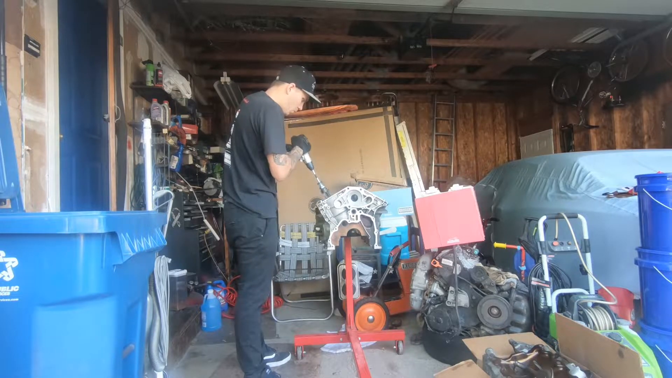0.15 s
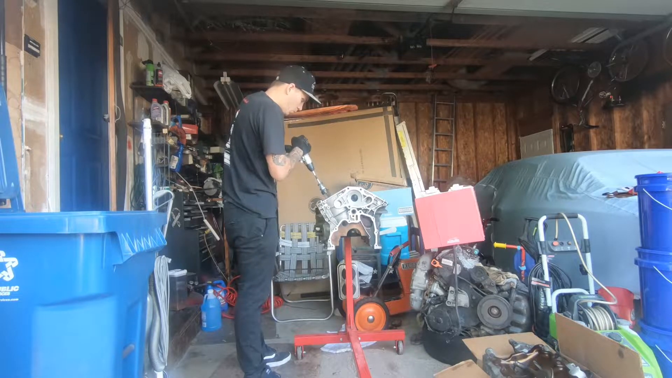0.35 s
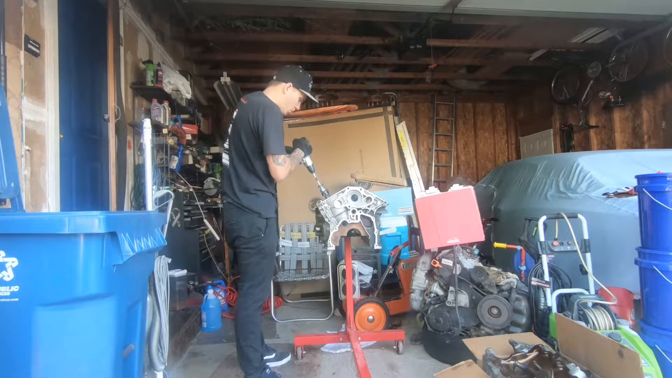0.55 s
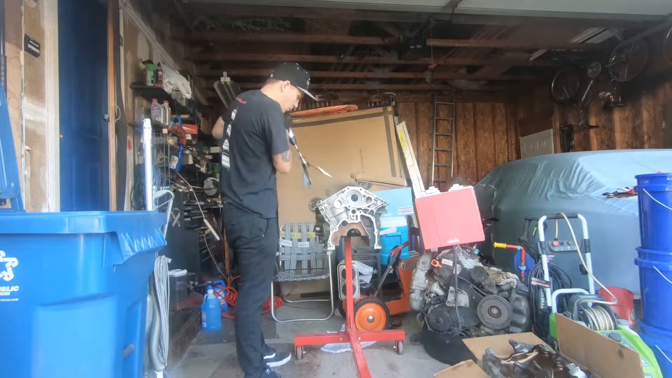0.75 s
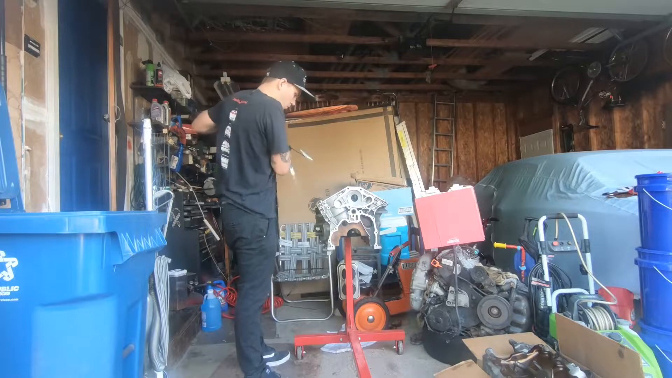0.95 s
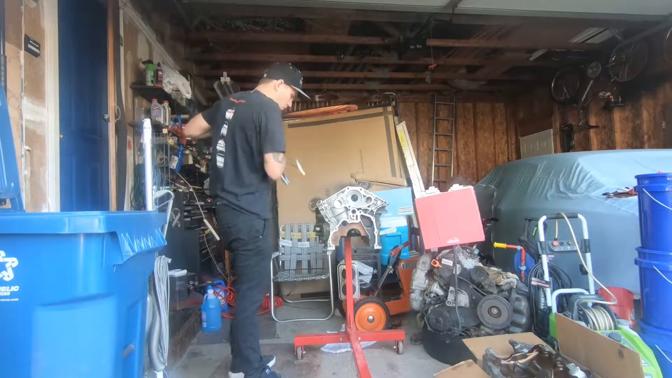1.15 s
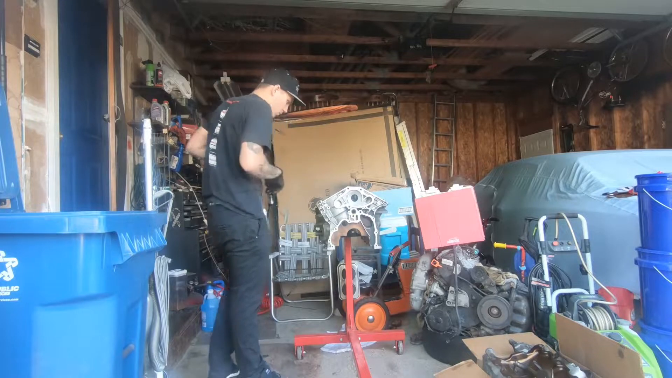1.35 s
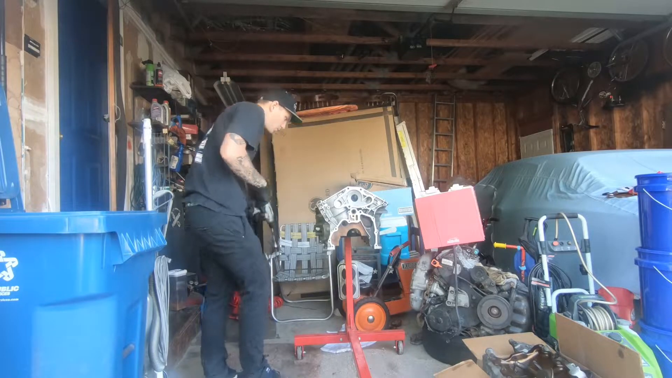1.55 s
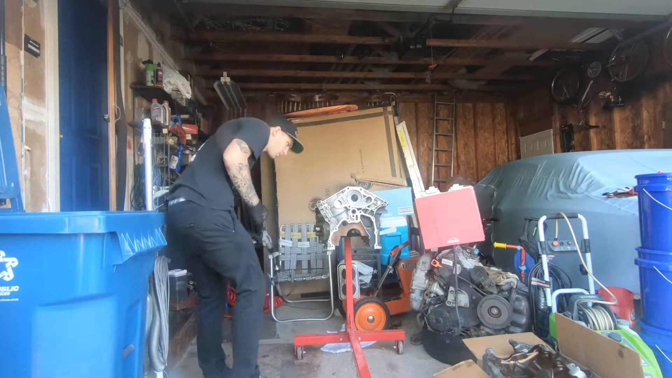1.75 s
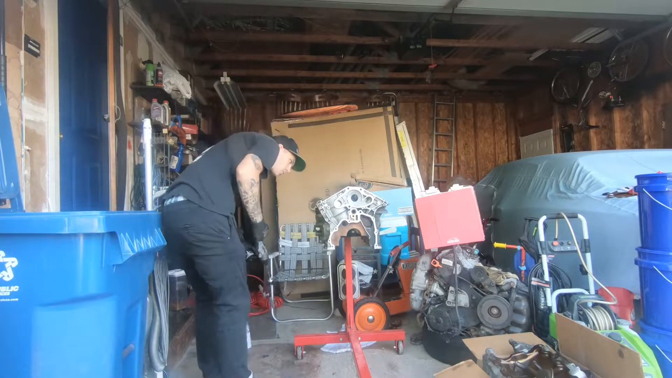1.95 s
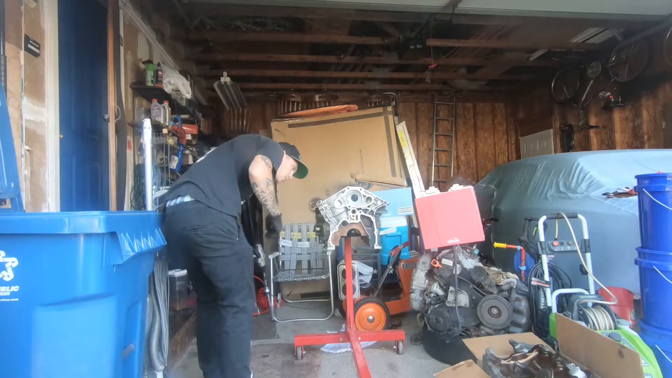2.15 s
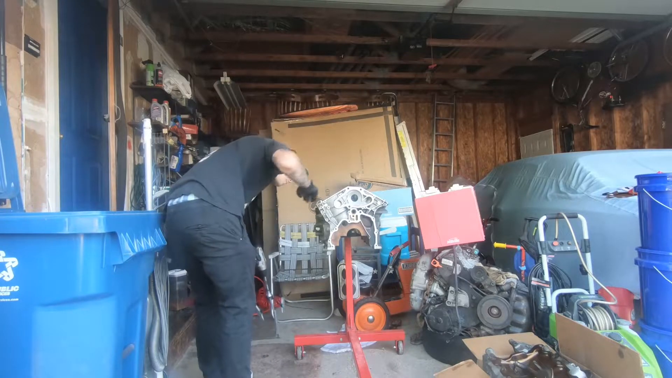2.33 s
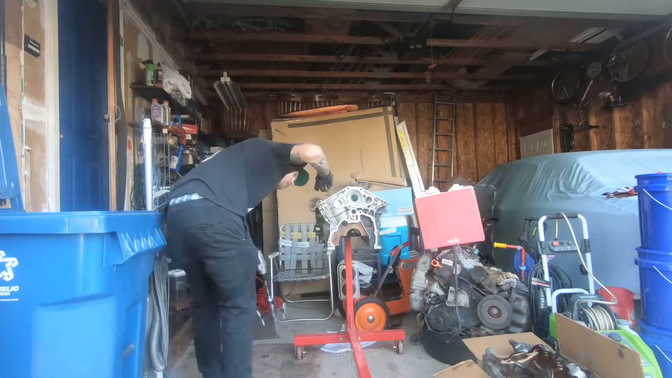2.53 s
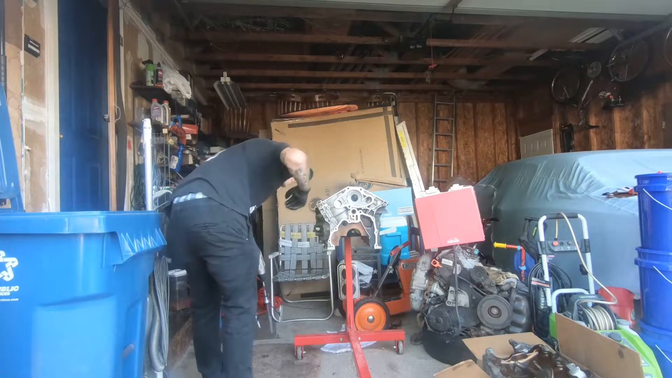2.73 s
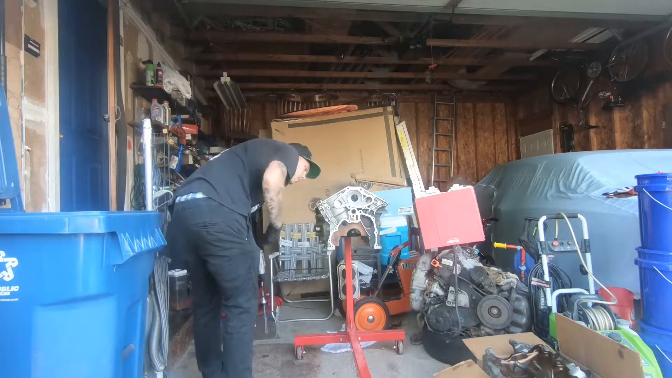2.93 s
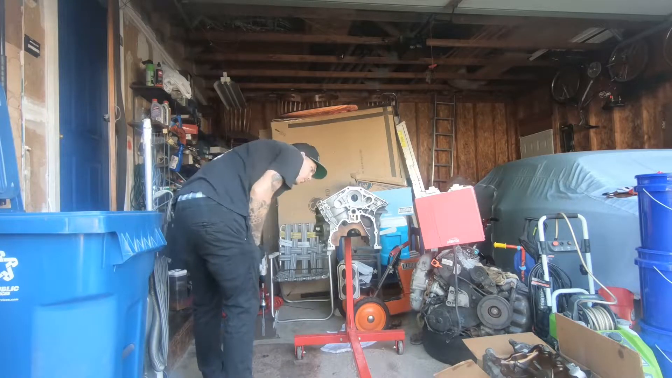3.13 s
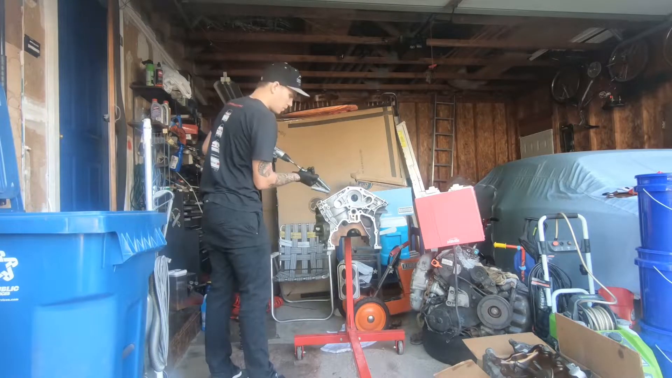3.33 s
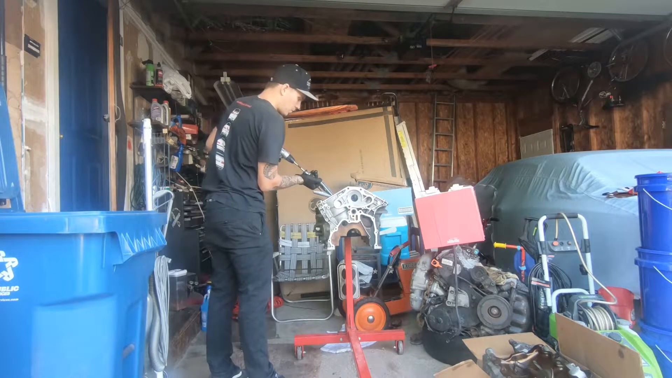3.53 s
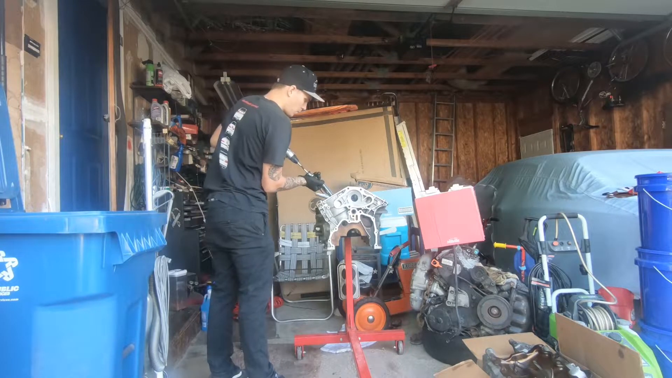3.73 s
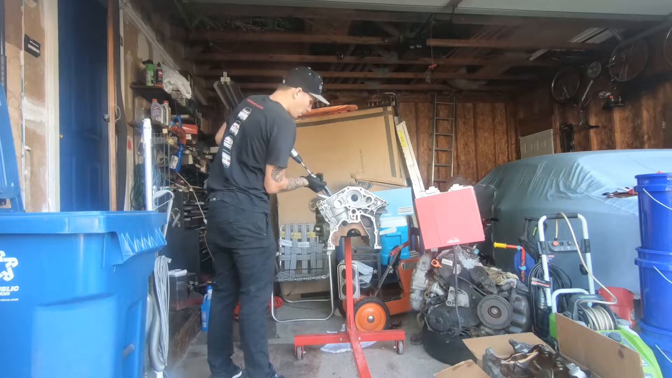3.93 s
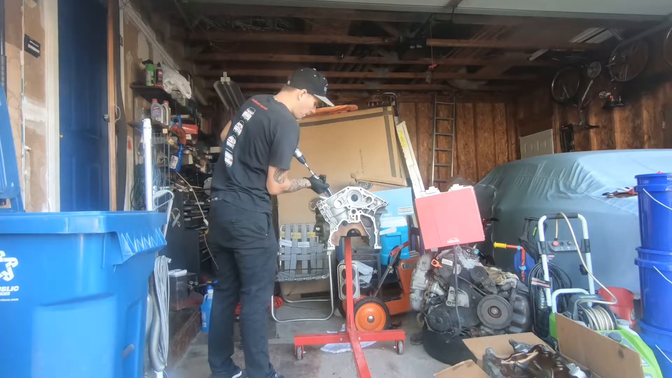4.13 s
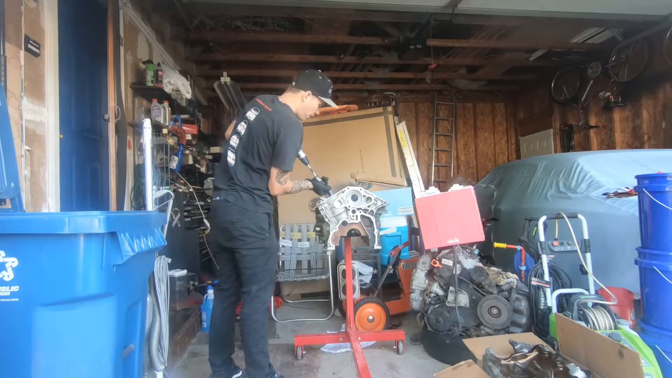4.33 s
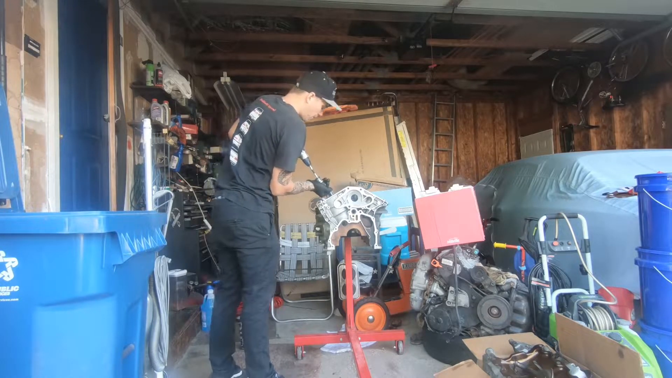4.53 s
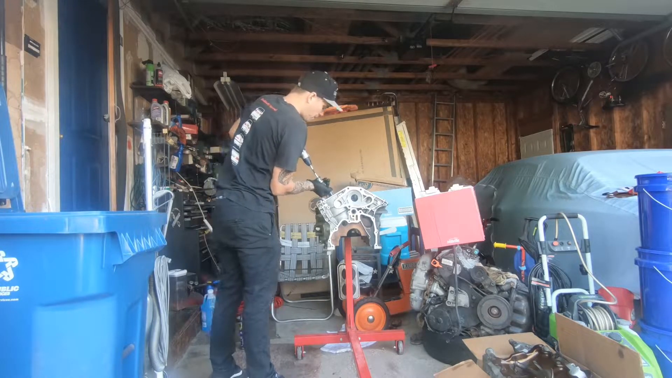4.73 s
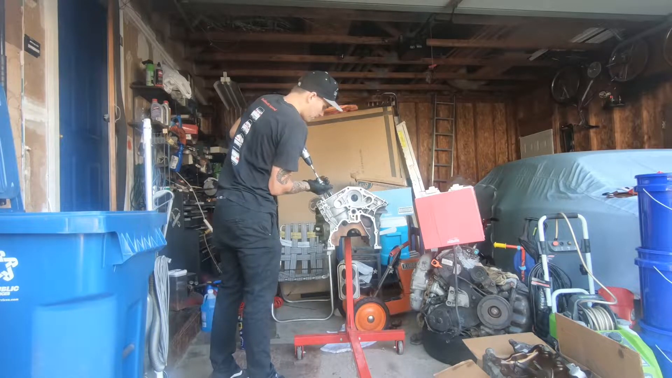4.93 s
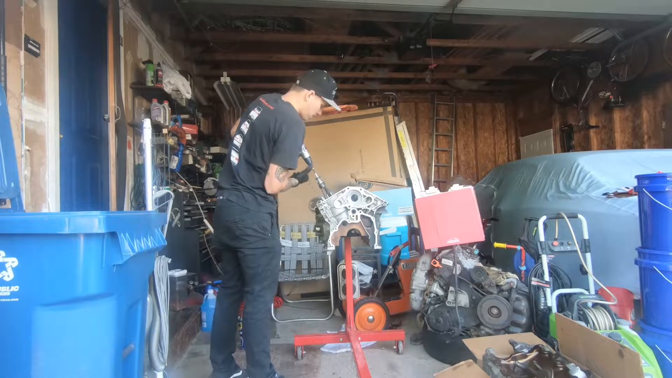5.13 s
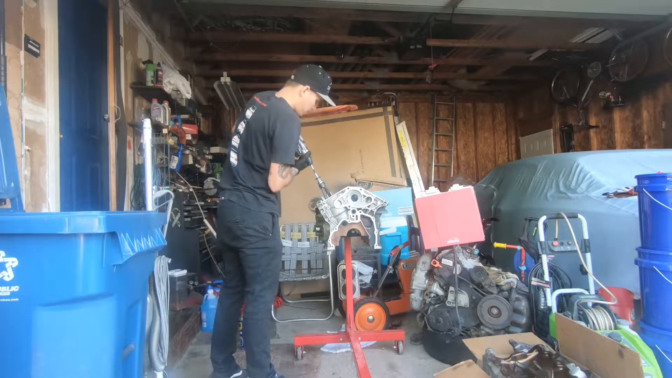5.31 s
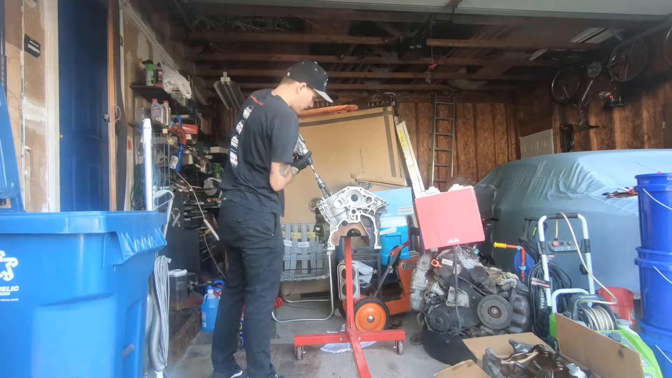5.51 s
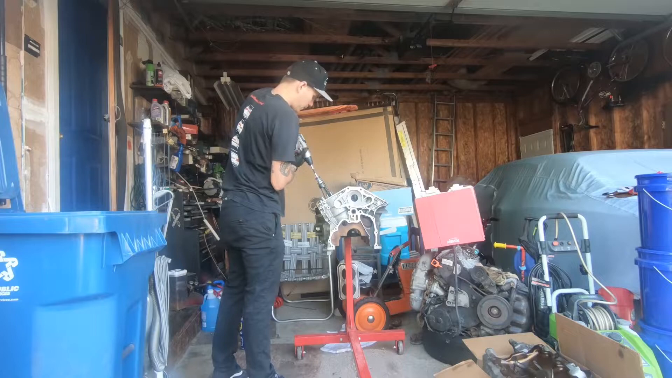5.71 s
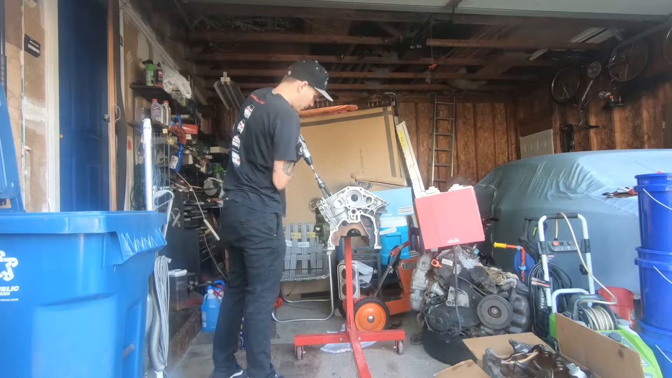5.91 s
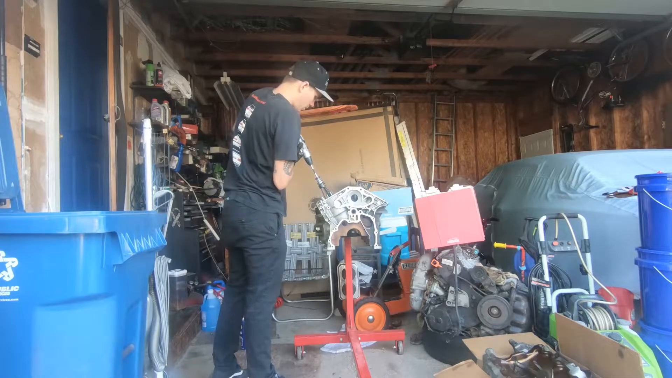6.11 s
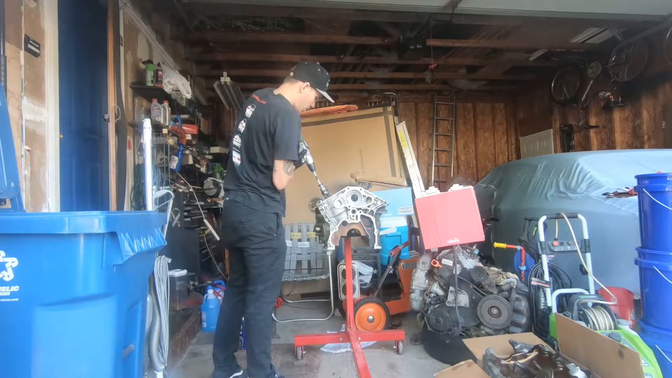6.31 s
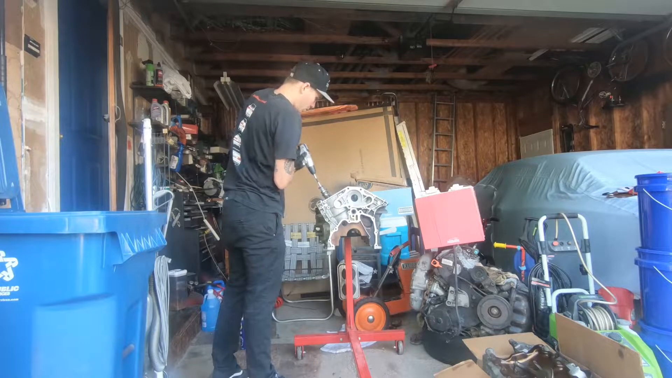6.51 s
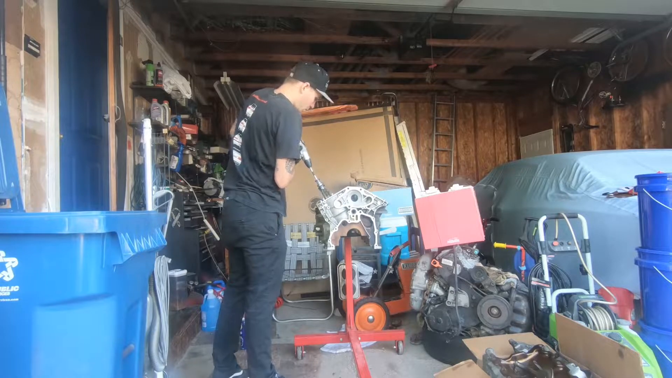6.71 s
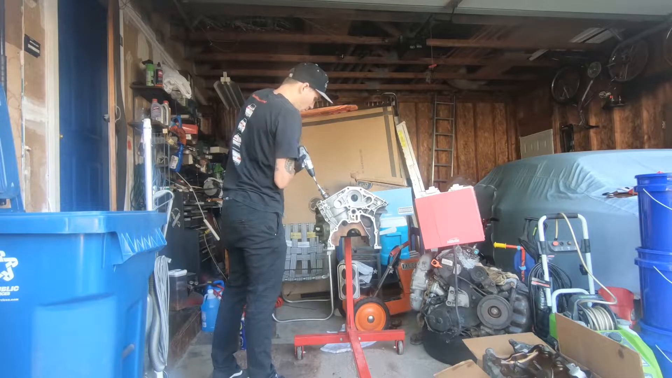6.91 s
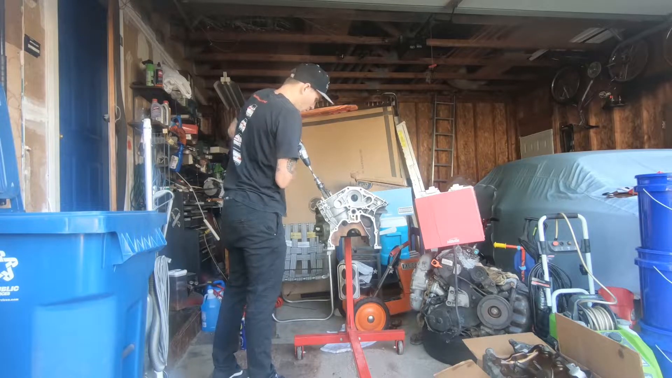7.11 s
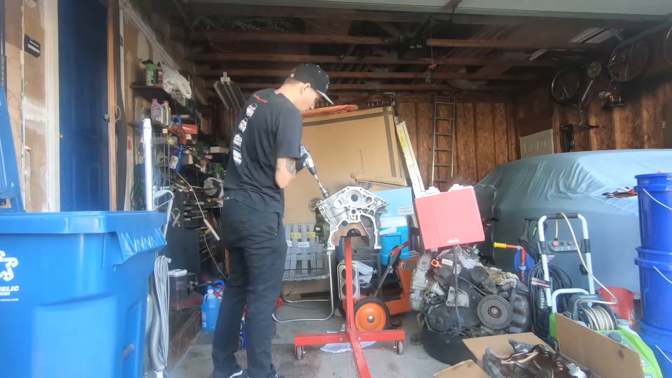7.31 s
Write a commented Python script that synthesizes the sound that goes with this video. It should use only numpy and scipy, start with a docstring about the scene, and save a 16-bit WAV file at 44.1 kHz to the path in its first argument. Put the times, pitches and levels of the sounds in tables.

```python
"""A honing tool scrapes the bore of an engine block in an open garage: dense grit noise rings the iron's modes.
Gusts buffet two microphone ports as bass noise over a faint yard, a throbbing insect and a swelling low drone.
The stones knock on the iron as they pass the rim, rattles striking the modes; a short squeak slides down,
the tool is pulled out, a cricket chirps, a shoe scuffs concrete and a steady hiss sets in. The tool is put
back with more knocks, a small part pings as one decaying sine, and the honing starts again."""
import sys
import numpy as np
from scipy import signal
from scipy.fft import rfft, irfft
from scipy.io import wavfile
from scipy.ndimage import uniform_filter1d

SR = 44100
rng = np.random.default_rng(int(sys.argv[2]) if len(sys.argv) > 2 else 0)


def dump(signal):
    """Clip the signal to [-1, 1] and save it as 16-bit WAV at the path in sys.argv[1]."""
    limited = np.clip(np.atleast_2d(signal).T, -1, 1)
    pcm = np.round(limited * 32767).astype(np.int16)
    wavfile.write(sys.argv[1], SR, pcm)


N = 324576
T = np.arange(N) / SR
SLOW_T = T[::16]   # coarse clock for slow controls
HZ = np.maximum(np.arange(N // 2 + 1) * SR / N, 1)

# modes of the engine block: [f/Hz, relative level under the stones/dB, level under a knock/dB, base t60/s]
BLOCK_MODES = [(302, -21, -40, .25), (690, -26, -40, .25), (912, -20, -35, .3), (1410, -32, -16, .42),
               (1613, -15, -10, .24), (2158, -13, -16, .3), (2272, -19, -11, .25), (2450, -10.5, -14, .3),
               (2552, -17, -11, .3), (2862, -13, -13, .3), (3095, -14, -13, .3), (3313, -11, -4, .3),
               (3399, -7, -6, .25), (3461, -9, -4, .22), (3619, -12, -6, .36), (3790, -13, -2, .36),
               (4046, -12, -14, .25), (4753, -22, -10, .2), (5280, -12, -15, .2), (5671, -10, -9, .2),
               (5925, -8, -14, .25), (6360, -15, -15, .15), (6998, -17, -15, .25)]
# left-right likeness of sounds in the garage: [f/Hz, correlation 0 to 1]
NEAR_LIKENESS = [(60, 0.12), (110, 0.15), (200, 0.12), (380, 0.3), (700, 0.3), (1290, 0.02), (2380, 0.74),
                 (4400, 0.9), (8120, 0.15), (15000, 1)]
# left-right likeness of sounds from outside: [f/Hz, correlation -1 to 1]
FAR_LIKENESS = [(60, -0.23), (150, -0.12), (380, -0.33), (950, -0.76), (2380, 0.42), (5980, 0.17),
                (15000, -0.36)]
# stereo lean of the work on the block: [f/Hz, left over right/dB]
WORK_LEAN = [(60, 14.5), (150, -4), (380, -18), (950, -5.5), (2380, -0.5), (5980, -3), (15000, 2)]


def from_db(db):
    """Decibels to gain."""
    return 10 ** (np.asarray(db) / 20)


def rms_one(x):
    """Scale to unit rms."""
    return x / np.sqrt(np.mean(x ** 2) + 1e-20)


def in_time(rows):
    """Columns of a curve at every sample; the level (first column) is silent outside the rows."""
    s, level, *rest = np.transpose(rows)
    return [np.interp(T, s, level, -140, -140)] + [np.interp(T, s, c) for c in rest]


def at_hz(points):
    """A spectrum table read at every frequency bin, straight lines over log frequency."""
    hz, value = np.transpose(points)
    return np.interp(np.log(HZ), np.log(hz), value)


def swell_db(start, hold, rise, fall, t=T):
    """Rise, hold at 0 dB, fall; slopes in dB per second."""
    return -rise * np.maximum(start - t, 0) - fall * np.maximum(t - start - hold, 0)


def drift(rate):
    """Slow random wander of spread 1, low-passed around the rate in Hz."""
    hz = np.fft.rfftfreq(len(SLOW_T), SLOW_T[1])
    spectrum = rfft(rng.standard_normal(len(SLOW_T))) / (1 + (hz / rate) ** 2)
    return np.interp(T, SLOW_T, rms_one(irfft(spectrum, len(SLOW_T))))


def grains(per_s, spread_db):
    """Two unrelated trains of random clicks of uneven size."""
    sizes = from_db(spread_db * np.minimum(rng.exponential(1, (2, N)), 5)) * rng.standard_normal((2, N))
    return rms_one(sizes * (rng.random((2, N)) < per_s / SR))


def stereo(pair, spectrum, likeness, lean_db=0):
    """Two unrelated signals become a coloured left and right that are partly alike; rms 1."""
    mid, side = rfft(pair) * from_db(at_hz(spectrum))
    alike = np.clip(at_hz(likeness), -1, 1)
    both = np.sqrt(1 + alike) * mid + np.sqrt(1 - alike) * side * [[1], [-1]]
    return rms_one(irfft(both * from_db(lean_db * np.array([[.5], [-.5]])), N))


def band(x, low_hz, high_hz, order=2):
    """Band-pass."""
    return signal.sosfilt(signal.butter(order, [low_hz, high_hz], "band", fs=SR, output="sos"), x)


def ring(force, hz, t60):
    """A two-pole resonance: a unit click sets a dying sine of starting height 1 ringing."""
    r, w = from_db(-60 / (t60 * SR)), 2 * np.pi * hz / SR
    return signal.lfilter([0, np.sin(w)], [1, -2 * r * np.cos(w), r * r], force + 1e-18)


def honing():
    """Dense grit contacts: a broad scrape, and the same force ringing the block."""
    # passes of the stones in the bore, one curve each: [t/s, level/dB, treble gain/dB]
    passes = [
        [(0.0, -38.5, 4), (0.09, -43, 3.5), (0.18, -37.5, 3.5), (0.45, -43, 3), (0.47, -38.5, 9),
         (0.56, -48.5, 3.5), (0.67, -41, 9.5), (.72, -41, 12)],
        [(6.12, -72, -15), (6.214, -45, -5), (6.285, -39.5, 2), (6.38, -39, 1.5), (6.5, -38, 2.5),
         (6.7, -38, 3), (6.8, -40.5, 2.5), (7.04, -36.5, 4), (7.18, -37.5, 2), (7.36, -40.5, 3)],
    ]
    # colour of the grit: [f/Hz, relative level per Hz/dB]
    grit_colour = [(150, -43), (250, -23.5), (482, -25.5), (930, -14.5), (1110, -16), (1560, -7.5),
                   (2280, -10), (2410, -5), (3170, -5), (3400, 3), (4640, -12), (5810, -1.5), (8210, -15),
                   (13300, -27), (15600, -26)]
    force = grains(per_s=9000, spread_db=1.0) * from_db(1.5 * drift(12.0))
    scrape = stereo(force, grit_colour, NEAR_LIKENESS, at_hz(WORK_LEAN))
    treble = band(scrape, 4600, 15000)
    # mostly the same force in both ears, with a little difference for width
    block_force = force[0] + 0.28 * force[1] * np.array([[1], [-1]])
    rings = np.zeros((2, N))
    for hz, stones_db, _, t60 in BLOCK_MODES:
        mode = rms_one(ring(block_force, hz, 1.9 * t60))   # rings longer than the base t60
        rings += from_db(stones_db + 1.794 * drift(3.1)) * mode
    rings = from_db(-4.0) * rms_one(rings)
    out = np.zeros((2, N))
    for rows in passes:
        level_db, treble_db = in_time(rows)
        out += from_db(level_db) * (scrape + (from_db(treble_db) - 1) * treble + rings)
    return out


def wind():
    """Lumpy turbulence in three bass bands, unrelated in the two ports; gusts and their wakes add as power."""
    # gusts: [start/s, hold/s, left/dB, right/dB, deep bass against the level/dB, upper bass against the level/dB]
    gusts = [(0.022, 0.061, -18, -29, -25, -5), (0.139, 0.052, -16.5, -33, -19, -6.5),
             (0.216, 0.094, -20.5, -29.5, -9, -7.5), (0.419, 0.12, -26.5, -34.5, -6.5, -19.5),
             (.56, 0.15, -38, -37.5, -14, -21), (0.729, 0.049, -34.5, -41, -13, -21.5),
             (.83, 0.015, -35.5, -46, -6, -18.5), (.9, 0.026, -40, -47, -2, -9.5),
             (1.25, 0.019, -53.5, -48.5, -3.5, -7.5), (1.33, 0.017, -38, -49.5, -7, -15.5),
             (1.71, .02, -42, -54, -0.5, -28), (1.85, 0.037, -62.5, -61, 8, 14),
             (1.959, 0.011, -31, -42.5, -12.5, -11), (2.08, .05, -50, -46, -4, -6.5),
             (2.25, 0.204, -67.5, -69.5, 9.5, 8), (2.79, 0.097, -47, -51, 5, -2),
             (2.94, 0.018, -43, -47, -6, 1.5), (3.0, 0.019, -20, -38, -17, -12),
             (3.039, 0.039, -31, -38, 0, -10), (3.189, 0.013, -31.5, -39, -10, -22),
             (4.22, 0.15, -63, -65.5, -1, 7), (4.55, 0.1, -66, -65, 11.5, 0),
             (4.81, 0.014, -31.5, -42.5, -10, -13.5), (5.0, 0.034, -50.5, -46, -2.5, -8),
             (5.11, 0.01, -39, -44, -11, -4), (5.75, .03, -26, -32.5, -12.5, -9),
             (5.811, 0.016, -24, -30, -12, -19), (5.861, 0.013, -30.5, -41, -6.5, -0.5),
             (6.041, 0.017, -35, -34, 0, -2.5), (6.21, .12, -62, -65, 14, -2),
             (6.42, .12, -72, -68, 15, -1), (7.072, .06, -30.5, -31.5, -14, -14),
             (7.16, 0.063, -35.5, -39.5, -4.5, -4.5), (7.342, .03, -46, -38, -8, 2.5)]
    # floor between gusts: [middle/dB, deep/dB, upper bass/dB]
    calm_db = (-76, -60.5, -63.5)
    gust_rise, gust_fall = 600, 550   # dB per s
    wake_db, wake_slope = -24.5, 180   # weaker stir before and after: dB under the gust, dB per s
    deep_slowness = 2.6   # the deep bass swells and fades this many times more slowly
    # doubled decibels give power; axes: band, port, time
    power = from_db(2 * np.array(calm_db))[:, None, None] * np.ones((3, 2, len(SLOW_T)))
    for start, hold, left_db, right_db, deep_db, upper_db in gusts:
        edge_db = swell_db(start, hold, gust_rise, gust_fall, SLOW_T)
        shapes = from_db(2 * np.array([edge_db, edge_db / deep_slowness + deep_db, edge_db + upper_db]))
        wake = from_db(2 * (wake_db + swell_db(start, hold, wake_slope, wake_slope, SLOW_T)))
        wakes = wake * from_db(2 * np.array([[0], [deep_db], [upper_db]]))
        ports = from_db(2 * np.array([[left_db], [right_db]]))
        power += (shapes + wakes)[:, None] * ports
    level = np.array([[np.interp(T, SLOW_T, np.sqrt(p)) for p in pair] for pair in power])
    white = rng.standard_normal((3, 2, N))
    deep = band(white[0], 20, 40, order=3)
    middle = band(white[1], 52, 96.6)
    upper = rms_one(band(white[2], 105, 176))
    lumps = from_db(1.18 * np.array([drift(6), drift(32)]))   # slow on the left, fast on the right
    # a gust holds its strength: chance swells of the narrow bands are evened out
    deep, middle = (b / np.sqrt(uniform_filter1d(b ** 2, size=SR // 14, axis=1)) for b in (deep, middle))
    buffeting = lumps * (level[0] * middle + level[2] * upper) + level[1] * deep
    return band(buffeting, 13.0, 355, order=3)


def yard():
    """A steady bed of coloured noise from outside, its level wandering slightly."""
    # colour of the yard: [f/Hz, relative level per Hz/dB]
    yard_colour = [(60, -41.5), (90, -27), (175, 2), (270, -9), (400, -18), (850, -15), (1250, -26),
                   (3000, -30), (5600, -27.5), (6700, -18.5), (7800, -20), (8900, -40), (13500, -46),
                   (15600, -56)]
    level = from_db(-57 + .8 * drift(2.5))
    return level * stereo(rng.standard_normal((2, N)), yard_colour, FAR_LIKENESS)


def throbbing_insect():
    """A high insect throbs without pause: noise rings one resonance under a pulsing gate."""
    song_hz, pulses_per_s, level_db = 8170, 18, -72
    throb = np.sin(np.pi * pulses_per_s * T + .3 * drift(2)) ** 4
    return from_db(level_db) * throb * rms_one(ring(rng.standard_normal((2, N)), song_hz, .014))


def drone():
    """Noise through two resonances at one low pitch swells and fades."""
    # swells: [start/s, hold/s, level/dB]
    swells = [(0.039, .33, -51.5), (3.55, 0.19, -67), (4.102, 0.94, -66), (5.096, 0.26, -57.5),
              (5.706, 0.25, -63.5), (6.357, 0.21, -56), (6.6, 0.35, -82)]
    slope, hz = 79, 297.2   # dB per s, Hz
    level = sum(from_db(db + swell_db(start, hold, slope, slope)) for start, hold, db in swells)
    return level * rms_one(ring(ring(rng.standard_normal((2, N)), hz, 0.08), hz, 0.018))


def knock_colour(hz, tilt_db, favoured_hz):
    """Brightness above the low mids, and a lift of the modes near the pitch favoured by the struck spot."""
    favour_db, favour_octaves = 10, .05
    lift_db = favour_db * np.exp(-.5 * (np.log2(hz / favoured_hz) / favour_octaves) ** 2)
    return from_db(tilt_db * np.log2(np.maximum(hz, 1500) / 3500) + lift_db)


def knocks():
    """Each knock is a short rattle of contacts that also strikes every mode with a strength of its own."""
    # knocks: [t/s, relative level/dB, rattle decay to 1/e/s, ring trim/dB, brightness/dB per octave,
    # favoured f/Hz]
    blows = [(.461, -21, 0.029, -6.5, -6.5, 3360), (0.686, -19, 0.022, -3, 8.5, 5830),
             (0.6923, -9, 0.024, 0, -0.5, 3540), (.7348, -35.5, 0.025, -14, 15, 5570),
             (0.7787, -24, 0.018, -4, 5, 4620), (0.813, -35, 0.032, 1, 4.5, 7300),
             (1.005, -40, 0.047, -4, 6, 4600), (1.052, -37.5, 0.027, -6.5, 5.5, 4770),
             (4.33, -44.5, 0.018, -2.5, -3.5, 3420), (4.754, -35, 0.22, -5, -3, 2500),
             (4.8059, -16, 0.015, 1.5, 1.5, 1586), (4.8251, -14, 0.021, -9.5, 4.5, 3470),
             (4.8287, -24, 0.027, 10.5, 2, 2540), (6.188, -36, 0.041, -16, -5, 2340),
             (6.4098, -13, 0.029, -2.5, 3, 2130), (6.428, -23, 0.021, -15, 9, 3000),
             (6.445, -22, 0.019, 2, -7, 2150)]
    # colour of the rattling contacts: [f/Hz, relative level per Hz/dB]
    clatter_colour = [(180, -58.5), (300, -39), (411, -27.5), (1490, -20.5), (1590, -11.5), (2570, -5),
                      (3030, -3.5), (3400, -0.5), (4080, -5.5), (6930, -7), (15600, -48.5)]
    # once the tool is back in the bore it damps the longest rings
    reentry_s, in_bore_t60_s = 3.2, 0.23
    clatter = stereo(grains(per_s=9100, spread_db=0.2), clatter_colour, NEAR_LIKENESS, at_hz(WORK_LEAN))
    luck_db = rng.normal(0, 1.5, (len(blows), len(BLOCK_MODES)))
    out = np.zeros((2, N))
    for (s, db, rattle_s, ring_db, tilt_db, favoured_hz), strengths_db in zip(blows, luck_db):
        i = round(s * SR)
        t = T[:min(N - i, SR // 2)]
        shape = from_db(db - 14.5) * np.exp(-t / rattle_s) * np.minimum(t / .0015, 1)
        bins_hz = np.linspace(1, SR / 2, len(t) // 2 + 1)
        spectrum = rfft(clatter[:, i:i + len(t)]) * knock_colour(bins_hz, tilt_db, favoured_hz)
        rattle = irfft(spectrum, len(t)) * shape
        click = 1. * (t == 0)
        rings = np.zeros(len(t))
        for (hz, _, mode_db, t60), own_db in zip(BLOCK_MODES, strengths_db):
            damped_t60 = min(t60, in_bore_t60_s) if s > reentry_s else t60
            strength = from_db(mode_db + own_db) * knock_colour(hz, tilt_db, favoured_hz)
            rings += strength * ring(click, hz, damped_t60)
        out[:, i:i + len(t)] += rattle + from_db(db - 19 + ring_db) * band(rings, 1220, 19000)
    return out


def squeak():
    """A sine of wavering level slides down in pitch."""
    # the slide: [t/s, level/dB, f/Hz]
    slide = [(.5, -70, 800), (.52, -49, 680), (.54, -50, 570), (.56, -70, 480)]
    level_db, hz = in_time(slide)
    return from_db(level_db + 4.2 * drift(60)) * np.sin(2 * np.pi * np.cumsum(hz) / SR)


def cricket():
    """A cricket chirps in short trills: narrow-band noise pulsed inside rounded gates."""
    # chirps: [t/s, length/s]
    chirps = [(1.205, .085), (1.56, .1), (1.81, .08), (2.16, .09), (2.43, .145), (2.75, .12), (3.075, .095),
              (3.24, .07), (3.56, .07), (3.8, .11), (4.07, .08), (4.38, .1)]
    song_hz, pulses_per_s, level_db = 4590, 28.3, -65.5
    gate = np.zeros(N)
    for s, length_s in chirps:
        inside = (T > s) & (T < s + length_s)
        arch = np.sqrt(np.abs(np.sin(np.pi * (T - s) / length_s)))
        pulses = .45 + .55 * np.sin(np.pi * pulses_per_s * (T - s)) ** 2
        gate += inside * from_db(level_db) * arch * pulses
    return gate * rms_one(band(rng.standard_normal((2, N)), .96 * song_hz, 1.04 * song_hz))


def scuff():
    """A shoe drags on concrete: dense uneven contacts swell and fade."""
    # colour of the sole: [f/Hz, relative level per Hz/dB]
    sole_colour = [(200, -7), (350, -3.5), (1100, -7.5), (2000, -11.5), (2800, -14.5), (3700, -10.5),
                   (4800, -20.5), (6500, -18), (9000, -53)]
    start_s, hold_s, level_db = 1.823, 0.094, -55.5
    rise, fall = 210, 110   # dB per s
    level = from_db(level_db + swell_db(start_s, hold_s, rise, fall))
    return level * stereo(grains(per_s=15000, spread_db=0.5), sole_colour, NEAR_LIKENESS)


def hiss():
    """A steady hiss sets in: coloured noise with a slight flutter."""
    # level of the hiss: [t/s, level/dB]
    hiss_level = [(3.22, -88), (3.235, -59), (4.7, -55), (5.2, -55.5), (6.2, -56.5), (7.36, -57)]
    # colour of the hiss: [f/Hz, relative level per Hz/dB]
    hiss_colour = [(300, 2), (500, -14), (800, -0.5), (1500, -7), (2600, -6.5), (3500, -2.5), (4700, -9),
                   (6100, -4.5), (7800, -5), (9000, -24), (14000, -35), (15600, -47)]
    level = from_db(in_time(hiss_level)[0] + 0.3 * drift(22))
    return level * stereo(rng.standard_normal((2, N)), hiss_colour, FAR_LIKENESS)


def ping():
    """A small part is touched: one high mode rings, nearer the right."""
    # the touch, a single row: [t/s, level/dB, f/Hz, t60/s]
    touch = (5.2415, -50, 6170, .12)
    s, db, hz, t60 = touch
    click = 1. * (np.arange(N) == round(s * SR))
    return from_db(db) * ring(click, hz, t60) * from_db([[-3], [3]])


def garage(x):
    """Reverberation: a dying noise tail, another one for each ear, faster in the treble."""
    t60_s, level_db = 0.3, -8
    t = T[:SR // 2]
    tail = rng.standard_normal((2, len(t))) * (t > .006)   # a gap before the reflections
    low = signal.lfilter([.4], [1, -.6], tail)
    high = tail - low
    tail = low * from_db(-60 * t / t60_s) + high * from_db(-60 * t / (0.43 * t60_s))
    tail /= np.sqrt(np.sum(tail ** 2, axis=1, keepdims=True))
    return from_db(level_db) * signal.fftconvolve(x, tail, axes=1)[:, :N]


def scene():
    """Work on the block in the garage, over yard, hiss, insects and wind."""
    work = knocks() + squeak() + ping()   # these sounds excite the room
    near = honing() + work + garage(work) + scuff()
    outside = yard() + throbbing_insect() + cricket()
    return near + outside + hiss() + drone() + wind()


def record(dry):
    """The top is cut by a steep low-pass."""
    cutoff_hz = 15680
    return signal.sosfilt(signal.ellip(12, .5, 65, cutoff_hz, fs=SR, output="sos"), dry)


dry = scene()
out = record(dry)
dump(out)
```